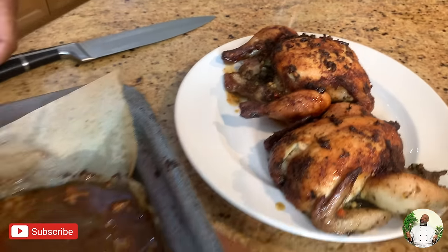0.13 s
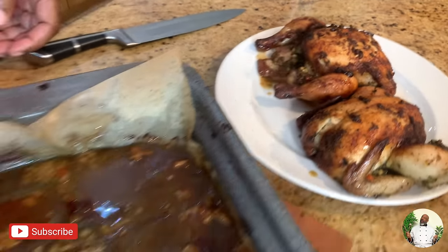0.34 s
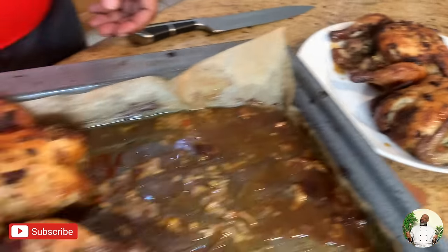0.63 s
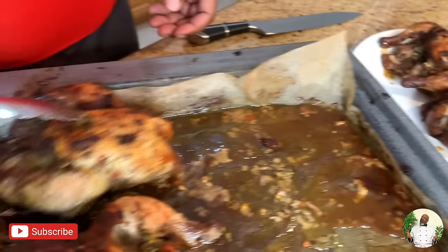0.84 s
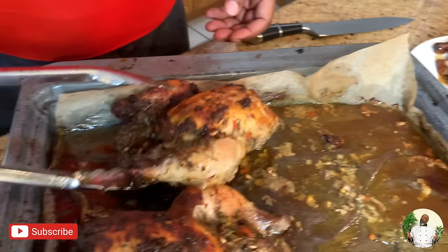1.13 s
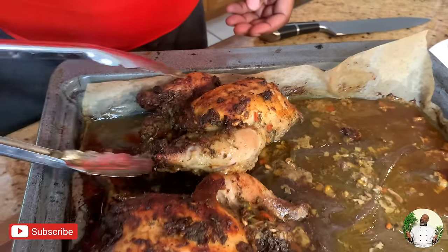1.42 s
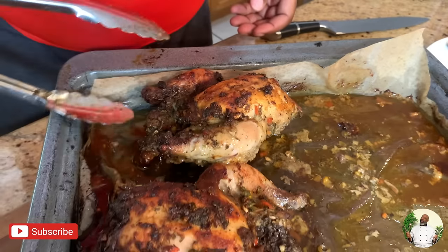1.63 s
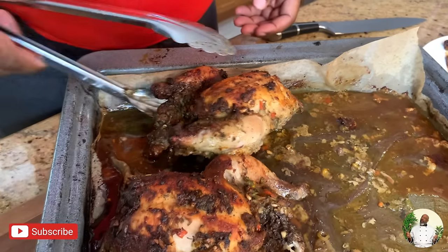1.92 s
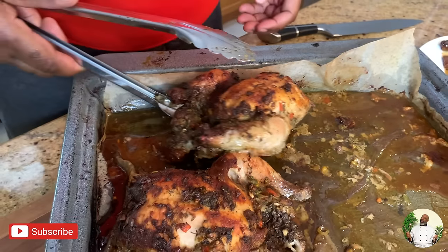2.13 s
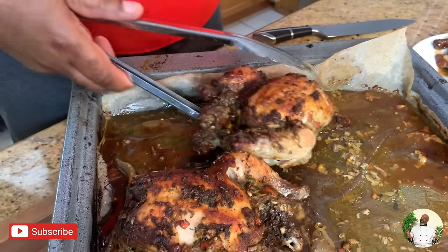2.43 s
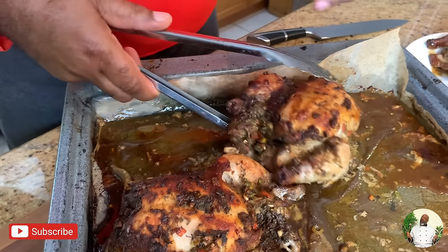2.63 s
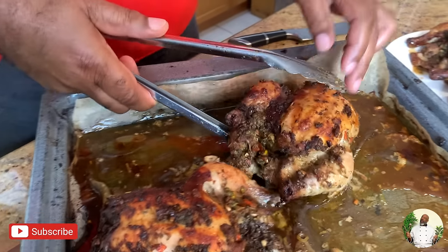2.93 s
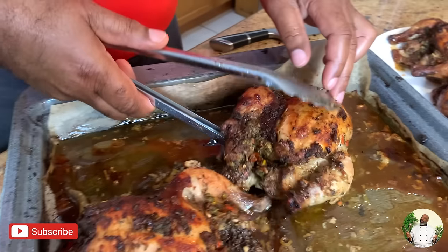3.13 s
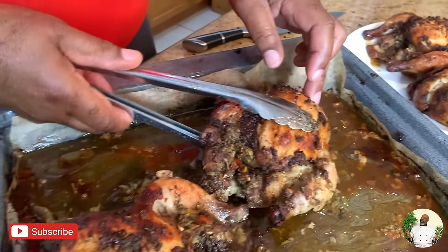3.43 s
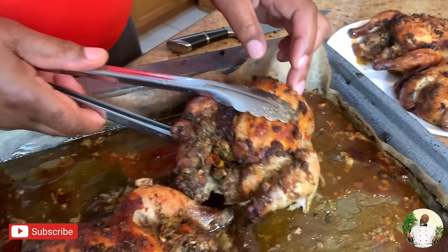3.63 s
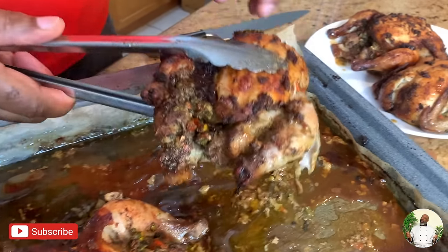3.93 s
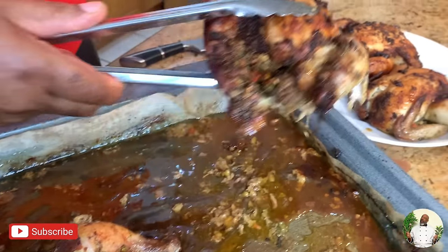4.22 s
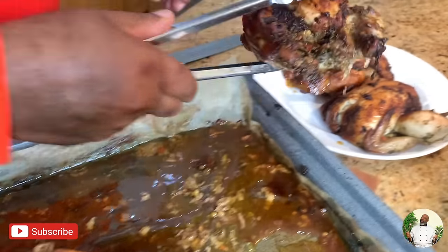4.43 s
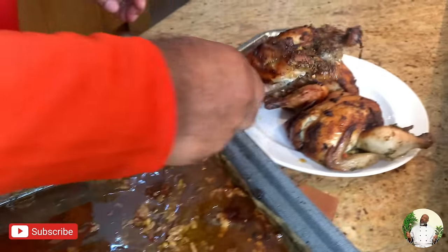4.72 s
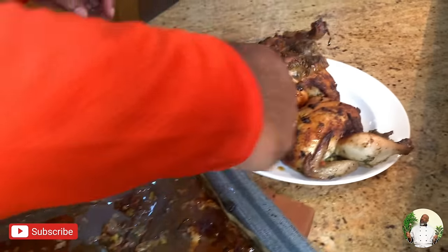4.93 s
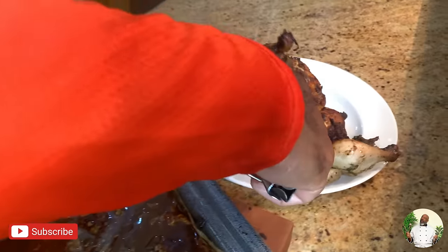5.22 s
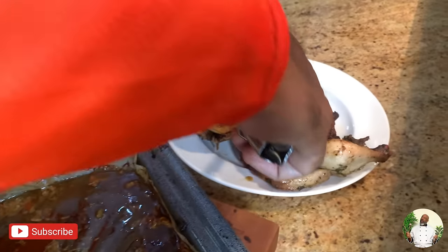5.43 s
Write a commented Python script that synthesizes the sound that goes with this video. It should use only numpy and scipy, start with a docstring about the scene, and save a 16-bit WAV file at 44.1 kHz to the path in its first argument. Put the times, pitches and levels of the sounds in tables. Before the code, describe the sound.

In a small home kitchen, heard close in stereo, steel tongs clank twice on a thin roasting pan. Wet crackling and sloshing follow as a roast bird shifts in juices. Another knock comes with a short squeak and rattle, then sharp sticky snaps as it is gripped and pulled free. After a quieter carry with faint cloth rustle, it thuds softly on a plate with bright tong clinks, over low hum and faint hiss.

```python
"""Steel tongs knock, scrape and squeak on a paper-lined roasting pan as they lift a small roast bird out.
The pan rings in struck modes over a short clatter; stick and slip on its rim makes the squeaks.
Wet skin and paper snap, crackle, slosh and gulp in the juices, built from noise pops and ringing air pockets.
The bird lands on a china plate with soft thuds, the tongs clink with a bright ring, and a sleeve brushes past.
A low hum, a faint hiss and a thin whine lie below, in a home kitchen with short reflections."""
import sys
import numpy as np
from scipy import signal
from scipy.fft import rfft, irfft
from scipy.io import wavfile
from scipy.ndimage import uniform_filter1d

SR = 44100
rng = np.random.default_rng(int(sys.argv[2]) if len(sys.argv) > 2 else 0)


def master(y):
    """Save y as 16-bit WAV."""
    cut = np.clip(np.atleast_2d(y).T, -1, 1)
    pcm = np.round(cut * 32767)  # scale
    wavfile.write(sys.argv[1], SR, pcm.astype(np.int16))


N = 245586
TIME = np.arange(N) / SR
HIT = TIME[:SR // 2]   # half a second, the span of one touch
FLAT = [(100, 0), (16000, 0)]   # an even spectrum

# Touches of the tongs on the pan. Each row: start in seconds, level in dB, contact in seconds,
# place along the rim (0 to 2, beyond 2 counts as 2), brightness in dB per octave, clatter in dB.
TONG_KNOCKS = [(0.225, -3.5, 0.0038, 0.29, -0.5, -6.5), (0.326, -14.5, 0.04, 0.4, 2, -4.5),
               (0.363, -21.5, 0.0089, 0.67, 5.5, -14), (0.5530, -2, 0.005, 1.06, 1, 2.5),
               (0.590, -20.5, 0.06, 1.13, 8.5, 10.5), (1.689, -18.5, 0.0085, 2.4, -1.5, -8.5),
               (1.708, -20, 0.006, 2.2, 0.5, -3), (1.726, -16, 0.017, 2, 1, -4),
               (1.8102, -1.5, 0.0069, 2, 3.5, 4.5), (1.820, -11.5, 0.008, 2, -4, -2),
               (1.843, -17, 0.032, 1.66, -3, 4), (1.890, -22.5, 0.046, 2.2, -7, 7)]


def from_db(db):
    """Decibels to gain."""
    return 10 ** (np.asarray(db) / 20)


def rms_one(x):
    """Scale to unit rms."""
    return x / np.sqrt(np.mean(x ** 2) + 1e-20)


def unit_energy(x):
    """Scale each channel to unit energy."""
    return x / np.sqrt(np.sum(x ** 2, axis=-1, keepdims=True) + 1e-20)


def at_hz(points, hz):
    """Read a table on a log-frequency axis."""
    f, value = np.transpose(points)
    return np.interp(np.log(np.maximum(hz, 1)), np.log(f), value)


def dying(t, t60):
    """Exponential decay, 60 dB down after t60."""
    return np.exp(-np.log(1000) * t / max(t60, 1e-4))


def add(out, s, sound):
    """Mix a sound in at time s; if it starts before zero only the rest is heard."""
    start = round(s * SR)
    sound, start = sound[:, max(-start, 0):], max(start, 0)
    out[:, start:start + sound.shape[1]] += sound[:, :N - start]


def high_pass(x, hz):
    """Fourth-order low cut."""
    return signal.sosfilt(signal.butter(4, hz, "high", fs=SR, output="sos"), x + 1e-18)


def shaped(white, spectrum, peak_hz=1000, peak_db=0):
    """Two unrelated signals become coloured stereo, alike in the bass, with one optional broad resonance."""
    # Stereo width. Each row: frequency in Hz, left-right likeness from -1 to 1.
    likeness = [(60, 0.95), (250, 0.92), (500, 0.4), (1000, 0.092), (2200, -0.24), (4000, 0.21),
                (8000, -0.051)]
    hz = np.fft.rfftfreq(white.shape[1], 1 / SR) + 1
    mid, side = rfft(white)
    alike = np.clip(at_hz(likeness, hz), -1, 1)
    resonance_db = peak_db * np.exp(-(np.log2(hz / peak_hz) / 0.38) ** 2)
    gain = from_db(at_hz(spectrum, hz) + resonance_db)
    stereo = np.sqrt(1 + alike) * mid + np.sqrt(1 - alike) * side * [[1], [-1]]
    return rms_one(irfft(gain * stereo, white.shape[1]))


def noise(spectrum, size, peak_hz=1000, peak_db=0):
    """Coloured stereo noise, rms 1."""
    return shaped(rng.standard_normal((2, size)), spectrum, peak_hz, peak_db)


def grains(spectrum, per_s, spread_db, t30):
    """A stream of tiny noise bursts of uneven size, each 30 dB down after t30."""
    born = rng.random(N) < per_s / SR
    sizes = born * from_db(spread_db * np.minimum(rng.exponential(1, N), 3.5))
    power = signal.lfilter([1], [1, -dying(1 / SR, t30)], sizes ** 2 + 1e-18)
    return shaped(np.sqrt(power) * rng.standard_normal((2, N)), spectrum)


def flutter(per_s, size):
    """Random values drawn per_s times a second and joined by straight lines; at most 400 are drawn."""
    turns = rng.standard_normal(400)
    return np.interp(TIME[:size] * per_s, np.arange(len(turns)), turns)


def contact(length, rise_s=0.0074):
    """Force envelope of metal chattering on a surface for a given time."""
    return np.exp(-np.minimum(HIT / max(length, 5e-4), 5) ** 4) * (1 - dying(HIT, rise_s))


def ring(force, hz, t60):
    """One mode driven by a force; it holds the energy of a dying sine of height 1."""
    r, w = dying(1 / SR, t60), 2 * np.pi * hz / SR
    mode = signal.lfilter([1, 0, -1], [1, -2 * r * np.cos(w), r * r], force + 1e-18)
    return unit_energy(mode) * np.sqrt(np.sum(dying(HIT, t60) ** 2) / 2)


def from_left(x):
    """Sound from the left reaches the right ear a little later."""
    lag_s = .00012
    return np.array([x[0], np.interp(TIME - lag_s, TIME, x[1])])


def pan():
    """Each touch drives the modes that move at its place on the rim, over a quickly dying clatter."""
    # Pan modes. Each row: frequency in Hz, decay t60 in seconds, then the level in dB, before the
    # touch's brightness, when struck at place 0, at place 1 and at place 2.
    pan_modes = [(253, 0.18, -70, -52, -25), (331.6, 0.51, -75, -72, -40.5), (425, 0.15, -50, -52, -57),
                 (470, 0.11, -45, -41, -59), (494, 0.16, -32, -25.5, -36.5), (507, 0.5, -51, -71, -57),
                 (552, 0.076, -34, -29, -60), (645, 0.11, -36.5, -39, -42), (703, 0.08, -45, -52, -55),
                 (901, 0.1, -42, -42, -47), (990, 0.1, -43, -50, -47), (1082, 0.13, -51, -31, -42),
                 (1224, 0.16, -58, -68, -36), (1485, 0.15, -62, -56, -45), (1582, 0.065, -39, -24.5, -49),
                 (1632, 0.07, -38, -35, -31.5), (1700, 0.038, -37, -36, -52), (1770, 0.06, -47, -44, -36),
                 (1880, 0.032, -34, -44, -50), (1990, 0.05, -29, -42, -53), (2190, 0.093, -36, -52, -49),
                 (2375, 0.04, -24, -40, -54), (2512, 0.13, -50, -39, -37.5), (2610, 0.1, -47, -35, -49),
                 (2900, 0.086, -54, -50, -39), (2986, 0.055, -50, -34.5, -62),
                 (3470, 0.13, -44, -37.5, -58), (3700, 0.045, -62, -59, -35),
                 (3730, 0.061, -58, -56, -36.5), (4090, 0.07, -44, -59, -41), (4190, 0.095, -44, -52, -40),
                 (4560, 0.09, -60, -58, -52), (5500, 0.037, -62, -52, -33.5), (6460, 0.04, -66, -54, -31.5),
                 (7300, 0.028, -67, -56, -34.5), (7980, 0.025, -60, -50, -29), (8360, 0.023, -58, -32, -34),
                 (9500, 0.02, -54, -46, -54)]
    # Dense upper modes of the sheet metal. Each row: frequency in Hz, relative level in dB per Hz.
    clatter_colour = [(150, -45), (320, -55), (480, -9.5), (800, -2), (1050, 0.5), (1300, -10.5),
                      (1700, -2.5), (3200, 0), (4400, -4), (5500, -9), (10000, -8), (14000, -5.5),
                      (17000, -66)]
    clatter_base_db, clatter_t60 = -21, 0.013
    rattle_depth, rattle_per_s, rattle_full_hz = 0.47, 172, 2500   # slower modes flutter less
    out = np.zeros((2, N))
    for s, db, length, place, tilt_db, clatter_db in TONG_KNOCKS:
        push = contact(length)
        force = push * noise(FLAT, size=len(HIT))
        modes = 0
        for hz, t60, *by_place in pan_modes:
            octaves = np.clip(np.log2(hz / 1000), -1, 2)
            level_db = np.interp(place, np.arange(3), by_place) + tilt_db * octaves
            # long waves from the pan floor reach both ears alike
            drive = force[:1] if hz < 800 else force
            depth = rattle_depth * min(hz / rattle_full_hz, 1)
            rattle = (1 + depth * flutter(rattle_per_s, size=len(HIT))) / np.hypot(1, depth)
            modes = modes + from_db(level_db) * rattle * ring(drive, hz, t60)
        # the clatter gathers energy for as long as the contact lasts
        energy = signal.lfilter([1], [1, -dying(1 / SR, clatter_t60) ** 2], push / push.sum())
        clatter = np.sqrt(energy) * noise(clatter_colour, size=len(HIT))
        add(out, s, from_db(db) * (modes + from_db(clatter_base_db + clatter_db) * clatter))
    return out


def squeaks():
    """Stick and slip hold one mode of the rim in a rough, wavering tone over grit, until the tongs let go."""
    # Slides of the tongs on the rim. Each row: start in seconds, length in seconds, pitch in Hz, level in dB.
    slides = [(0.362, .016, 1600, -48), (0.598, .024, 1595, -45), (0.612, .035, 3480, -50),
              (1.688, 0.023, 498.5, -41), (1.693, 0.069, 1754, -48), (1.735, 0.0072, 1770, -35.5),
              (1.751, 0.068, 516, -52), (1.8114, 0.018, 1762, -21.5), (1.813, .03, 500, -38.5),
              (1.812, 0.014, 1626, -30), (1.841, 0.008, 1765, -34), (1.842, 0.022, 1480, -42),
              (1.846, 0.0057, 558, -36), (1.862, 0.0065, 545, -36), (1.867, 0.05, 1786, -51),
              (1.878, 0.011, 502, -44), (1.903, 0.019, 510, -43), (1.934, 0.02, 1456, -48),
              (1.958, 0.014, 542, -48)]
    # Scraping grain. Each row: frequency in Hz, relative level in dB per Hz.
    grit_colour = [(500, -24), (1300, -6), (2000, -6), (3000, -5), (4200, 0), (10000, -3), (16000, -23)]
    rise_s, release_t60, waver_share = 0.0055, 0.021, 0.015   # rise to -60 dB of full; waver is rms share of pitch
    overtone_db, grit_db = -22, -16
    rough_db, slips_per_cycle = 3, .08   # the grip comes and goes
    out = np.zeros((2, N))
    for s, length, hz, db in slides:
        waver = rms_one(uniform_filter1d(rng.standard_normal(len(HIT)), size=200))
        phase = 2 * np.pi * hz * np.cumsum(1 + waver_share * waver) / SR
        envelope = (1 - dying(HIT, rise_s)) * dying(np.maximum(HIT - length, 0), release_t60)
        grip = from_db(rough_db * flutter(slips_per_cycle * hz, size=len(HIT)))
        # roughness keeps the energy of the smooth envelope
        rough = unit_energy(envelope * grip) * np.sqrt(np.sum(envelope ** 2))
        tone = np.sin(phase) + from_db(overtone_db) * np.sin(2 * phase)
        grit = from_db(grit_db) * noise(grit_colour, size=len(HIT))
        add(out, s, from_db(db) * rough * (tone + grit))
    return out


def rim():
    """Two close modes still ring from an earlier touch, beating as they die, until the first knock damps them."""
    hz, level_db, t60, beat_hz, partner_db = 510, -47.5, .7, 18.4, -16
    upper = np.sin(2 * np.pi * hz * TIME)
    lower = from_db(partner_db) * np.sin(2 * np.pi * (hz - beat_hz) * TIME)
    damped = dying(np.maximum(TIME - TONG_KNOCKS[0][0], 0), .1)
    tone = from_db(level_db) * (upper + lower) * dying(TIME, t60) * damped
    return from_left(np.tile(tone, (2, 1)))


def plate(crack_db=-20):
    """Steel on china: a hard crack and a short bright ring."""
    # Tongs on the plate. Each row: start in seconds, level in dB, contact in seconds.
    clinks = [(5.0948, -5, 0.001), (5.111, -12, 0.0023), (5.2726, -17.5, 0.0057), (5.297, 2, 0.0056)]
    # Their ring. Each row: frequency in Hz, level in dB, decay t60 in seconds.
    clink_modes = [(1870, -37.5, 0.024), (2050, -51, 0.02), (2730, -31.5, 0.021), (2860, -42, 0.05),
                   (3160, -38.5, 0.035), (3750, -36.5, 0.039), (4180, -39.5, 0.068), (4470, -41, 0.045),
                   (4350, -44, .05), (5270, -40, 0.043), (5674, -41, 0.072), (6200, -38, 0.05),
                   (6900, -43, .05), (7050, -43, 0.016), (7540, -42, 0.029), (8700, -40, 0.046),
                   (9500, -37, 0.025), (10000, -32, 0.022), (10200, -37, .025), (12870, -34, 0.048)]
    # Colour of the crack. Each row: frequency in Hz, relative level in dB per Hz.
    crack_colour = [(500, -48), (1200, -28), (1900, -12), (4500, -8), (7500, 7.5), (10000, 6),
                    (13500, -1.5), (17000, -26)]
    out = np.zeros((2, N))
    for s, db, length in clinks:
        force = contact(length) * noise(crack_colour, size=len(HIT))
        modes = sum(from_db(mode_db) * ring(force, hz, t60) for hz, mode_db, t60 in clink_modes)
        add(out, s, from_db(db) * (from_db(crack_db) * force + modes))
    return out


def dragging():
    """Each drag builds up and lets go; gives the level of crackle and of slosh over time, in dB."""
    # Meat dragged through the juices or over the plate. Each row: fastest motion in seconds, build-up in
    # seconds, let-go in seconds, peak crackle in dB before the trim in juices(), peak slosh in dB.
    drags = [(0.06, 0.4, 0.2, -53.5, -60.5), (0.8, 0.41, 0.23, -59, -59.5), (0.9, 0.11, 0.1, -43, -56.5),
             (1.0, 0.056, 0.028, -43.5, -50), (1.08, 0.28, 0.23, -47, -57.5), (1.99, 0.17, 0.12, -50, -53),
             (2.1, 0.35, 0.2, -45.5, -55.5), (2.41, .06, .1, -49, -62), (2.511, 0.15, 0.1, -41.5, -55.5),
             (2.62, 0.21, 0.11, -38, -60), (3.2, 0.25, 0.29, -56.5, -68), (3.64, 0.29, 0.065, -49.5, -62.5),
             (5.04, 0.076, 0.043, -54.5, -63.5), (5.135, 0.11, 0.15, -49.5, -64),
             (5.3, 0.11, 0.22, -44.5, -81), (5.57, 0.12, 0.085, -48, -68)]
    swell_db, curve = 18.5, 0.99   # fade over one build-up or let-go time; a curve above 1 rounds the top
    crackle, slosh = [], []
    for s, build_s, release_s, crackle_db, slosh_db in drags:
        away = np.maximum((s - TIME) / max(build_s, .01), (TIME - s) / max(release_s, .01))
        fade_db = swell_db * np.minimum(away, 4) ** curve
        crackle.append(crackle_db - fade_db)
        slosh.append(slosh_db - fade_db)
    return np.max(crackle, axis=0), np.max(slosh, axis=0)


def small_snaps(drag_db):
    """Weak snaps at random while the meat moves in the pan, as strong as the drag: rows of (s, dB, Hz, t60)."""
    per_s, over_drag_db, spread_db, t60 = 60, 17, 4.5, 0.0081   # snap energy against the drag's level
    low_hz, high_hz = 3550, 13700
    still_db, lifted_s = -58, 4.2   # none come under this drag level or after the bird is lifted
    draws = rng.random((600, 4))
    share = per_s * N / SR / len(draws)   # how many of the draws may become snaps
    rows = []
    for when, chance, size, pitch in draws:
        s, level_db = when * N / SR, drag_db[int(when * N)]
        if level_db > still_db and s < lifted_s and chance < share:
            snap_db = level_db + over_drag_db + spread_db * (2 * size - 1)
            rows.append((s, snap_db, low_hz * (high_hz / low_hz) ** pitch, t60))
    return rows


def snaps(drag_db, resonance_db=8, rise_s=0.00092):
    """Films of fat and crisp skin part in millisecond pops, each with a pitch of its own."""
    # Loud snaps of wet skin and paper. Each row: start in seconds, energy in dB, pitch in Hz, decay t60 in seconds.
    loud_snaps = [(0.351, -22.5, 8700, 0.023), (0.8755, -24, 13000, 0.0074), (0.8932, -15.5, 7950, 0.0054),
                  (0.9133, -22, 5470, .007), (0.932, -16.5, 9300, 0.011), (0.9423, -16.5, 9450, 0.011),
                  (0.9598, -15, 8000, 0.008), (0.9728, -19, 9000, 0.0076), (0.984, -8.5, 10100, 0.004),
                  (1.0078, -12.5, 9400, 0.0098), (1.0254, -13, 13000, 0.0073), (1.054, -20.5, 10000, .012),
                  (1.0596, -18, 7150, 0.017), (1.0830, -17, 12400, .011), (1.1072, -20.5, 4000, .025),
                  (1.1453, -23, 12500, 0.0076), (1.149, -18.5, 11000, .005), (1.1602, -23, 9000, 0.0066),
                  (1.170, -26, 12500, .012), (1.4206, -26, 7040, 0.012), (2.0005, -23, 8160, 0.014),
                  (2.068, -23, 4660, 0.013), (2.0787, -19.5, 10400, .012), (2.1350, -7.5, 10100, 0.0096),
                  (2.143, -17, 9000, 0.033), (2.2279, -17.5, 3950, 0.022), (2.36, -21, 9180, 0.012),
                  (2.403, -24.5, 9000, 0.018), (2.436, -27.5, 4500, .01), (2.4845, -25, 6000, .008),
                  (2.498, -23, 5000, .007), (2.511, -13, 4950, 0.013), (2.5262, -10.5, 9900, 0.0055),
                  (2.561, -3, 11700, .012), (2.6145, -11, 9900, .014), (2.6468, -11.5, 5000, 0.013),
                  (2.6502, -3, 6970, 0.015), (2.6532, -1, 5140, 0.013), (2.664, -14, 3980, 0.012),
                  (2.697, -12, 5060, 0.015), (2.7086, -18, 4740, 0.019), (3.109, -29.5, 3700, 0.014),
                  (3.2735, -28.5, 9800, 0.0089), (3.2952, -35, 3500, .008), (3.5074, -14, 4300, .008),
                  (3.5091, -9, 10300, .005), (3.5095, 0, 4350, 0.0065), (3.5209, -13, 4380, 0.0094),
                  (3.581, -31, 4500, .007), (3.604, -24, 4570, 0.008), (3.624, -17, 9800, 0.034),
                  (3.6373, -15, 5900, 0.02), (3.646, -14, 4200, 0.022), (5.1124, -10.5, 11300, 0.021),
                  (5.119, -15.5, 6000, .02)]
    # Colour of a 10 kHz snap without its resonance. Each row: frequency in Hz, relative level in dB per Hz.
    snap_colour = [(150, -31), (500, -18), (1300, -8.5), (2300, -16.5), (4200, 1.5), (7000, -4),
                   (10000, 1.5), (14000, 0.5), (17000, -22)]
    out, t = np.zeros((2, N)), TIME[:2048]
    for s, db, hz, t60 in loud_snaps + small_snaps(drag_db):
        octaves = np.log2(hz / 10 ** 4)
        # lower snaps have more body and less of the top treble
        body_db, top_db = -1 * octaves, 7.5 * octaves
        colour = [(f, level + body_db * (f < 3000) + top_db * (f > 12000)) for f, level in snap_colour]
        envelope = np.minimum(t / rise_s, 1) ** 4 * dying(t, t60)
        pop = envelope * noise(colour, size=len(t), peak_hz=hz, peak_db=resonance_db)
        add(out, s, from_db(db) * unit_energy(pop))
    return out


def bubbles(per_s=800, cycles=8):
    """Pockets of air open in the juices, each ringing for a few cycles at its own pitch."""
    # Slosh colour. Each row: frequency in Hz, relative level in dB of the bubbles at that pitch.
    slosh_colour = [(250, -3), (500, 3), (900, 0.5), (1400, 8), (2300, 2), (4000, -25)]
    out = np.zeros((2, N))
    pitches = np.geomspace(420, 2400, 16)
    for hz in pitches:
        born = rng.random(N) < per_s / len(pitches) / SR
        r, w = dying(1 / SR, cycles / hz), 2 * np.pi * hz / SR
        pops = rms_one(signal.lfilter([1, 0, -1], [1, -2 * r * np.cos(w), r * r], born + 1e-18))
        # a few samples between the ears place each pitch
        shifted = np.roll(pops, rng.integers(-6, 7))
        out += from_db(at_hz(slosh_colour, hz)) * np.array([shifted, pops])
    return rms_one(out)


def juices(high_db, low_db, crackle_trim_db=-4.0):
    """Fine crackle and a lower, bubbly slosh while the meat moves."""
    # Each row: frequency in Hz, relative level in dB per Hz.
    crackle_colour = [(1500, -11), (3000, -2.5), (4500, 1), (7500, -1.5), (10500, -0.5), (14000, -6.5),
                      (17000, -58)]
    crackle = grains(crackle_colour, per_s=800, spread_db=4.5, t30=.006)
    return from_db(high_db + crackle_trim_db) * crackle + from_db(low_db) * bubbles()


def gulps():
    """Air sucked in under the meat: a short swell of turbulence in the resonance of a pocket."""
    # Wet gulps. Each row: peak in seconds, half length in seconds, pitch in Hz, level in dB.
    wet_gulps = [(0.888, 0.0021, 1210, -48.5), (0.985, 0.0014, 1080, -44.5), (1.01, .003, 1280, -47),
                 (1.063, 0.0053, 910, -54), (2.094, .006, 1000, -55), (2.139, .006, 1460, -52.5),
                 (2.23, 0.0032, 1340, -50.5), (2.465, .02, 1000, -56), (2.519, .0025, 1550, -41),
                 (2.526, 0.005, 1150, -44.5), (2.652, 0.00324, 700, -38), (2.654, .004, 2430, -38.5),
                 (2.704, 0.0054, 950, -59), (3.511, 0.00083, 1560, -39.5), (3.643, 0.012, 1180, -51.5),
                 (5.042, .009, 2230, -56.5)]
    width = .5   # bandwidth of each of two equal resonators, as a share of the pitch
    out, t = np.zeros((2, N)), TIME[:4096]
    middle = t[-1] / 2
    for s, half, hz, db in wet_gulps:
        r, w = np.exp(-np.pi * width * hz / SR), 2 * np.pi * hz / SR
        pocket = [1, 0, -1, 1, -2 * r * np.cos(w), r * r]
        swell = np.exp(-((t - middle) / max(half, .001)) ** 2)   # at least 1 ms
        turbulence = swell * rng.standard_normal((1, len(t)))
        gulp = signal.sosfilt([pocket, pocket], turbulence + 1e-18)
        add(out, s - middle, from_db(db) * np.sqrt(np.sum(swell ** 2)) * unit_energy(gulp))
    return out


def thuds(splash_t60=0.13):
    """Soft weight gives a low damped swing and a dull splash."""
    # Weight shifting in the pan and landing on the plate. Each row: start in seconds, level in dB,
    # swing in Hz, splash against the swing in dB.
    landings = [(0.558, -73, 96, -6), (0.985, -65, 603, 5), (1.008, -69, 700, 4), (1.689, -45, 331.5, -7),
                (1.82, -54.5, 61.6, -9), (2.652, -53.5, 598, 4), (3.475, -43.5, 99.7, -3.5),
                (3.510, -50.5, 519, 7), (3.636, -59.5, 558, 11.5), (5.095, -46.5, 334, -8),
                (5.099, -50, 50.3, -8), (5.106, -41, 166.6, -7), (5.108, -48, 84, -10),
                (5.113, -51, 670, -2), (5.119, -49, 375, -6), (5.121, -42.5, 195.5, -14)]
    # Each row: frequency in Hz, relative level in dB per Hz.
    splash_colour = [(60, 8), (200, 6), (550, 15.5), (1400, 9.5), (2400, -8), (6000, -30)]
    swing_t60 = 0.19
    out = np.zeros((2, N))
    for s, db, hz, splash_db in landings:
        swing = np.sin(2 * np.pi * hz * HIT) * dying(HIT, swing_t60)
        splash = from_db(splash_db) * noise(splash_colour, size=len(HIT)) * dying(HIT, splash_t60)
        soft_start = 1 - dying(HIT, 0.0054)
        add(out, s, from_db(db) * (swing + splash) * soft_start)
    return out


def sleeve():
    """Cloth brushes past in soft, dull swells as the arm moves."""
    # Brushes of the sleeve. Each row: peak in seconds, half length in seconds, level in dB.
    brushes = [(2.93, 0.04, -66), (3.139, 0.067, -59.5), (3.324, 0.13, -66), (4.518, 0.12, -66.5),
               (4.976, 0.04, -65.5)]
    # Each row: frequency in Hz, relative level in dB per Hz.
    cloth_colour = [(100, -27), (200, -4), (380, 3), (600, 2), (900, -5), (1500, -9), (4000, -36)]
    swell = sum(from_db(db) * np.exp(-((TIME - s) / max(half, .01)) ** 2) for s, half, db in brushes)
    return swell * grains(cloth_colour, per_s=780, spread_db=2.2, t30=.011)


def kitchen(x, build_s=0.00073):
    """Diffuse reflections that build up quickly and die band by band."""
    # Reverberation. Each row: frequency in Hz, decay t60 in seconds.
    room_decay = [(100, 0.33), (500, 0.38), (2000, 0.21), (8000, 0.21), (16000, 0.09)]
    white = rfft(noise(FLAT, size=len(HIT)))
    hz = np.fft.rfftfreq(len(HIT), 1 / SR) + 1
    centres = np.geomspace(125, 16000, 8)
    tail = 0
    for centre, share in zip(centres, np.eye(len(centres))):
        # each band crossfades into its neighbours
        band = irfft(white * at_hz(list(zip(centres, share)), hz), len(HIT))
        tail = tail + band * dying(HIT, at_hz(room_decay, centre))
    tail = unit_energy(tail * np.minimum(HIT / build_s, 1) ** 2)
    return signal.fftconvolve(x, tail, axes=1)[:, :N]


def counter(x, share_db=0):
    """Near hard surfaces repeat each sound within milliseconds and comb its spectrum."""
    # First reflections from the pan walls and the counter.
    # Each row: delay in seconds, level in dB before the source's share.
    echoes = [(.0019, -20.5), (.0041, -18), (.0062, -15)]
    out = x.copy()
    for delay, db in echoes:
        add(out, delay, from_db(db + share_db) * x)
    return out


def ducking(x):
    """Gain of the low hum: it sinks while the treble of the sound is busy and then recovers."""
    depth_db, from_level_db, range_db = 6, -54, 1   # the full depth is reached range_db above from_level_db
    release_db_per_s, smooth_s = 96, 0.06
    power = uniform_filter1d(high_pass(x[0], hz=2000) ** 2, size=900)
    level_db = np.minimum(10 * np.log10(np.maximum(power, 1e-12)), from_level_db + 2 * range_db)
    # peaks are held and fall at a steady rate
    release_db = release_db_per_s * TIME
    held_db = np.maximum.accumulate(level_db + release_db) - release_db
    busy = np.clip((held_db - from_level_db) / range_db, 0, 1)
    r = np.exp(-1 / (smooth_s * SR))
    return from_db(-depth_db * signal.lfilter([1 - r], [1, -r], busy))


def background(hum_gain):
    """A low hum, a hiss whose level wanders a little and a faint thin whine."""
    # Each row of both: frequency in Hz, relative level in dB per Hz.
    hum_colour = [(20, -35), (45, -6), (75, -5), (97, 2), (122, -8.5), (156, 4.5), (190, -3.5), (237, 1.5),
                  (275, -12.5), (330, -2.5), (420, -10), (600, -28), (900, -12), (1500, -46)]
    hiss_colour = [(300, -47), (500, -5.5), (850, -16.5), (1250, -11.5), (1600, -10), (2200, -9),
                   (3400, -3.5), (5300, -11), (8200, -8.5), (11000, -17), (12000, -30), (13500, -19),
                   (15200, -51)]
    hum_db, hiss_db, whine_db = -62.5, -60.5, -83
    wander_spread_db, wander_s = 0.5, 0.205
    whine = from_db(whine_db) * rms_one(ring(rng.standard_normal(N), hz=1578, t60=0.44))
    turns = rng.standard_normal(size=200)
    wander_db = wander_spread_db * np.interp(TIME / wander_s, np.arange(len(turns)), turns)
    hum = hum_gain * from_db(hum_db) * noise(hum_colour, size=N)
    hiss = from_db(hiss_db + wander_db) * noise(hiss_colour, size=N)
    return hum + hiss + whine


def scene():
    """Close sources, each with its share of the room; thin steel radiates little bass, least of all far away."""
    metal = from_left(high_pass(pan(), hz=405.0))
    squeal = from_left(squeaks())
    china = high_pass(plate(), hz=1300)
    crackle_db, slosh_db = dragging()
    wet = high_pass(juices(crackle_db, slosh_db) + gulps(), hz=269)
    pops = high_pass(snaps(crackle_db), hz=275)
    to_room = from_db(-4.5) * high_pass(metal, hz=598) + from_db(-10.5) * squeal + from_db(-6.5) * china
    to_room += from_db(-11.5) * wet + from_db(-15) * pops
    room = kitchen(to_room)
    near = counter(metal + china + room) + counter(wet + pops, share_db=-3.5) + squeal
    return near + rim() + thuds() + sleeve() + background(ducking(near))


def record(dry):
    """From 8 kHz up the left channel turns mostly into the right one, 0.31 ms late; the extreme top is cut."""
    hz = np.fft.rfftfreq(N, 1 / SR)
    left, right = rfft(dry)
    turn = np.interp(hz, [8000, 9600], [0, 1.3])   # mixing angle in radians
    late = right * np.exp(-2j * np.pi * (hz - 10200) * .00031)   # in phase at 10.2 kHz
    both = irfft(np.array([np.cos(turn) * left + np.sin(turn) * late, right]), N)
    # 60 dB down from 16.8 kHz
    return signal.sosfilt(signal.cheby2(16, 60, 16800, fs=SR, output="sos"), both)


dry = scene()
out = record(dry)
master(out)
```